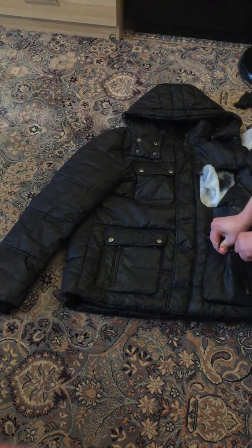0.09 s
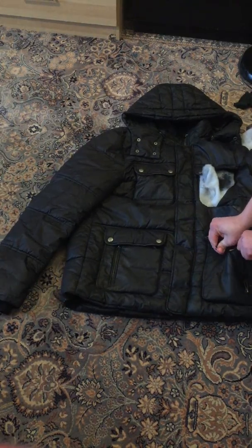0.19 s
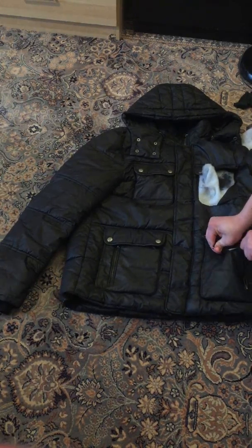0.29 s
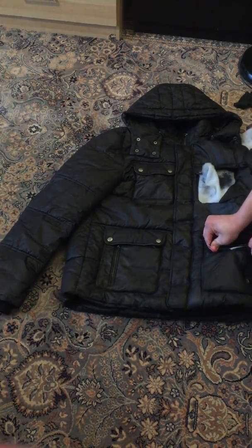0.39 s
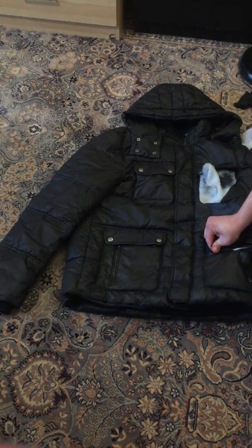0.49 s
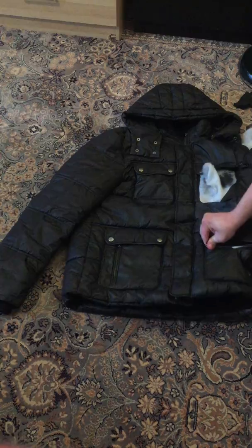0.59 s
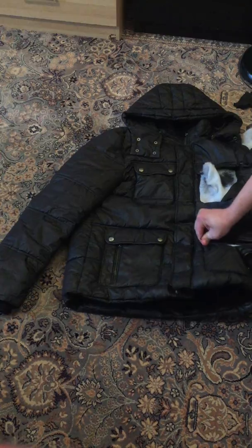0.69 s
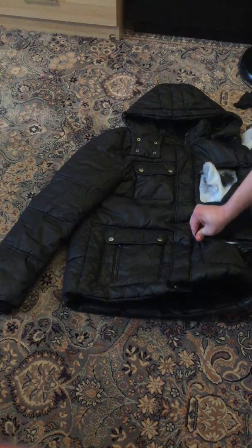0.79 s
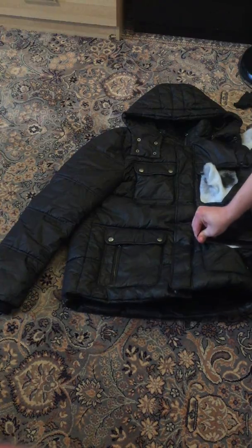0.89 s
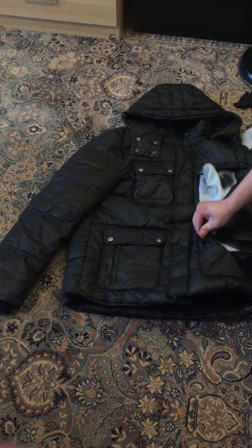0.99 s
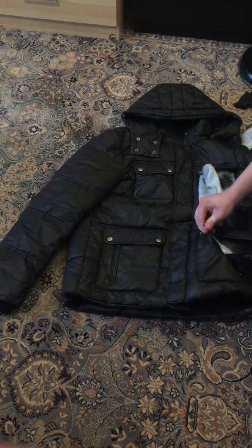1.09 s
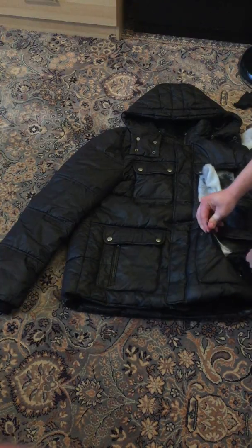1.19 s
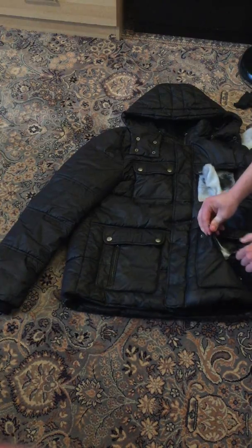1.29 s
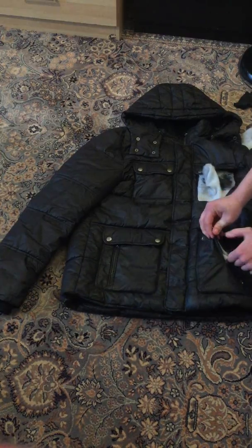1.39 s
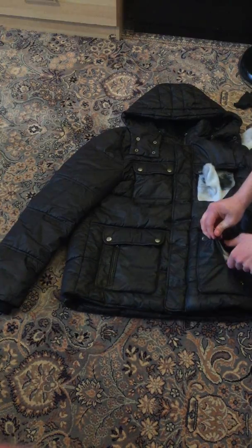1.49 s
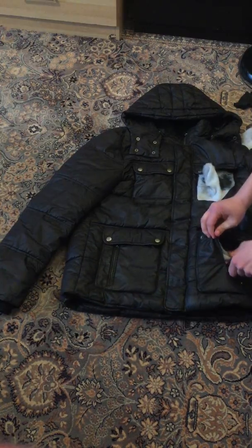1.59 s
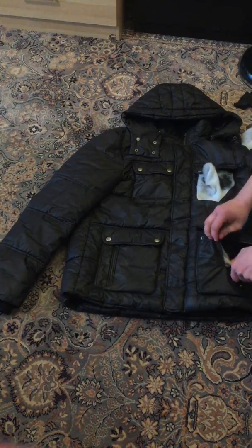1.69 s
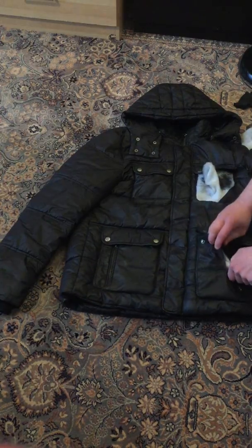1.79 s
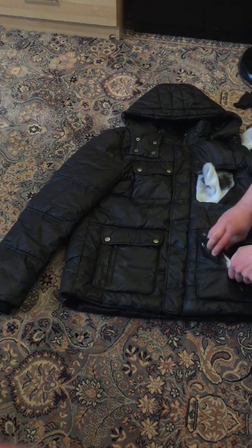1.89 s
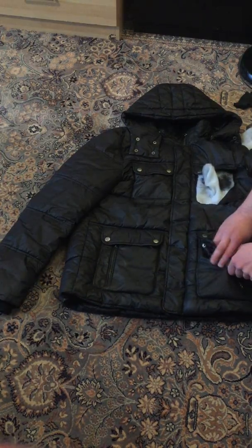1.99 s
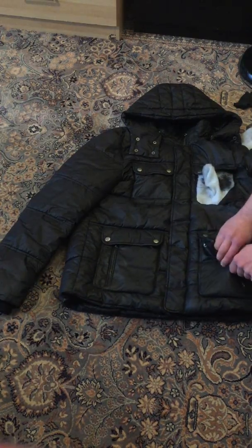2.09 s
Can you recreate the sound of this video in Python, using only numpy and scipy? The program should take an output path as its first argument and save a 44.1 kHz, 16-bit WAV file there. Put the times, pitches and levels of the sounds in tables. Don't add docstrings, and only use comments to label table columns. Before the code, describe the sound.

Jacket fabric tearing loudly by hand: a few single thread snaps, then two ragged, crackling rips within the first second, followed by barely audible rustling of the shell in a small carpeted room, close phone microphone.

```python
import sys
import numpy as np
from scipy import signal
from scipy.fft import rfft, irfft
from scipy.io import wavfile
from scipy.ndimage import uniform_filter1d

SR = 44100
rng = np.random.default_rng(int(sys.argv[2]) if len(sys.argv) > 2 else 0)


def materialize(psi):
    bounded = np.clip(np.atleast_2d(psi).T, -1, 1)
    quanta = np.round(bounded * 32767).astype(np.int16)
    wavfile.write(sys.argv[1], SR, quanta)


def field_ratio(decibels):
    return 10 ** (np.asarray(decibels, dtype=float) / 20)


N = 92610
T = np.arange(N) / SR

# centre_hz, level_db
FLAP_BODY = [(140, -27.5), (230, -8), (290, -8.5), (355, -2.5), (430, -12.5), (560, -12.5), (760, -36.5)]
# frequency_hz, level_db
THREAD_COLOUR = [(300, -43), (2000, -9), (3400, -2), (5300, -1), (7000, -3), (9500, 1), (12500, -1),
                 (16500, -4.5)]


def unit(x):
    return x / np.sqrt(np.mean(x ** 2))


def band(x, hz, width_hz):
    centre_hz = min(hz, 0.45 * SR)
    b, a = signal.iirpeak(centre_hz, hz / max(width_hz, 1.0), SR)
    return signal.lfilter(b, a, x)


def colour(x, points, size=2048):
    hz, db = np.array(points, float).T
    bins_hz = np.arange(size // 2 + 1) * SR / size
    log_gain = np.interp(np.log(bins_hz + 1), np.log(hz), db) * np.log(10) / 20
    cepstrum = irfft(log_gain)
    cepstrum[1:size // 2] *= 2
    cepstrum[size // 2 + 1:] = 0
    response = irfft(np.exp(rfft(cepstrum)))
    return signal.fftconvolve(x, response)[:len(x)]


def walk(rate_hz):
    hold = int(SR / rate_hz)
    levels = rng.standard_normal(N)[np.arange(N) // hold]
    return uniform_filter1d(levels, hold // 2 + 1)


def crackle(per_s, spread_db):
    clicks = rng.random(N) < per_s / SR
    size_db = spread_db * np.clip(rng.standard_normal(N), -3, 1.8)
    direction = np.sign(rng.standard_normal(N))
    return unit(clicks * field_ratio(size_db) * direction)


def air():
    # frequency_hz, level_db_per_hz
    hush_colour = [(88, -22), (150, -1.5), (1000, -8), (2010, -8.5), (4890, -15), (9390, -16.5),
                   (10600, -19), (12400, -18.5), (17000, -22.5)]
    # centre_hz, width_hz, level_db
    house_hum = [(54.2, 15, -76.5), (89.7, 33, -78), (115, 25, -75)]
    hush = unit(colour(rng.standard_normal(N), hush_colour, size=8192))
    hush_db = -68.5 + 0.87 * walk(28)
    hum = np.zeros(N)
    for hz, width_hz, db in house_hum:
        hum += field_ratio(db) * unit(band(rng.standard_normal(N), hz, width_hz))
    return hush * field_ratio(hush_db) + hum


def rips():
    # start_s, length_s, level_db, brightness_db_per_octave, edge_ring_hz
    runs = [(.0, 0.027, -42, -1, 6500), (0.032, 0.15, -56.5, 1, 14300), (0.2263, 0.0047, -28, 2.5, 5190),
            (0.247, 0.018, -53, -0.5, 8800), (0.2643, 0.0031, -26, -1.5, 8400),
            (0.272, 0.011, -35.5, 0.5, 9500), (0.288, 0.006, -30.5, 0.5, 8700), (0.3, 0.042, -36, -1, 8800),
            (0.346, 0.0053, -28.5, 0.5, 9250), (0.357, 0.011, -30.5, -0.5, 9350),
            (0.387, 0.006, -31, -1, 9200), (0.399, 0.0042, -32, 0.5, 8800), (0.406, 0.0097, -29.5, 0, 6250),
            (0.421, 0.003, -32, -2.5, 6000), (0.4332, 0.0029, -21.5, -0.2, 8500),
            (0.438, 0.012, -34.5, 0.5, 7900), (0.454, 0.028, -27, 1.9, 7100),
            (0.478, 0.0077, -25.5, -1, 7550), (0.488, 0.032, -25.5, -0.5, 11400),
            (0.498, 0.021, -39.5, 0, 3900), (0.522, 0.034, -26.5, -1, 5100), (0.558, 0.0083, -31, -1, 5000),
            (0.572, 0.013, -29, -0.8, 7340), (0.592, 0.013, -45.5, -0.5, 5000),
            (0.612, 0.0034, -39.5, 3.5, 7500), (0.617, 0.0041, -31, -1.5, 5000),
            (0.621, 0.0048, -36.5, -2.5, 7760), (0.627, 0.026, -53, 2, 8000),
            (0.65, 0.031, -28.5, -0.6, 7260), (0.683, 0.046, -29.5, -0.17, 4090),
            (0.732, 0.021, -32, -0.6, 12800), (0.756, 0.011, -48, -4.5, 8000),
            (0.7702, 0.0063, -25.5, 0.5, 11560), (0.781, .016, -31, -2, 12000),
            (0.8009, 0.054, -28.5, -1, 11940), (0.852, 0.048, -32.5, -1, 9700),
            (0.906, .014, -29.5, -2, 4400), (0.921, 0.022, -35.5, -1.5, 3920)]
    attack_s, release_s = 0.00057, 0.0013
    straggler_db, straggler_s = -15, 0.017
    edge_ring_db, edge_ring_q = 1, 5.9
    threads_per_s, thread_spread_db = 2600, 5.5
    clumps = field_ratio(1.5 * walk(260))
    shared = crackle(threads_per_s, thread_spread_db)
    parts = []
    for edges_hz in ((100, 4500), (4500, 9000), (9000, 20000)):
        grains = shared + 0.94 * crackle(threads_per_s, thread_spread_db)
        sos = signal.butter(2, edges_hz, "band", fs=SR, output="sos")
        parts.append(signal.sosfilt(sos, grains))
    low, middle, high = parts
    out = np.zeros(N)
    for start_s, length_s, db, tilt_db, ring_hz in runs:
        since = T - start_s
        after = np.clip(since - length_s, 0, None)
        decay = np.exp(-after / release_s) + field_ratio(straggler_db) * np.exp(-after / straggler_s)
        shape = np.clip(since / attack_s, 0, 1) * decay
        tilted = low * field_ratio(-3 * tilt_db) + middle + high * field_ratio(1.15 * tilt_db)
        run = shape * clumps * tilted
        edge_ring = band(run, ring_hz, ring_hz / edge_ring_q)
        out += field_ratio(db - 4.5) * (run + field_ratio(edge_ring_db) * edge_ring)
    return out


def snaps(rows, lift_db=0, extra_ring_db=0):
    click_db, ring_db = 2.5, -5
    fray_db, fray_t60_s = -16, 0.006
    creak_db, creak_s = -26, 0.0009
    size, lead = SR // 50, int(creak_s * SR)
    fray = np.exp(-np.log(1000) * np.arange(size) / SR / fray_t60_s) * field_ratio(fray_db)
    fade = np.roll(fray, lead)
    fade[:lead] = field_ratio(creak_db)
    out = np.zeros(N + SR)
    for (start_s, db, hz), fibre in zip(rows, rng.standard_normal((len(rows), size))):
        push = fibre * fade
        push[lead] = 1
        ring = 2 * band(push, hz, hz / 3)
        k = int(start_s * SR)
        out[k:k + size] += field_ratio(db + click_db + lift_db) * (push + field_ratio(ring_db + extra_ring_db) * ring)
    return out[:N]


def jerks():
    # time_s, level_db
    tugs = [
        (.170, -39),
        (.227, -33),
        (0.265, -30),
        (.435, -35),
        (0.734, -19.5),
        (0.786, -18),
    ]
    kicks = np.zeros(N)
    for time_s, db in tugs:
        kicks[int(time_s * SR)] = field_ratio(db + 22.5)
    return colour(kicks, FLAP_BODY)


def jacket():
    # time_s, peak_db, ring_hz
    first_snaps = [(0.0034, -25.5, 6130), (0.0128, -56, 5460), (0.0236, -28, 12500), (0.0274, -24.5, 10200),
                   (0.0502, -24, 10400), (0.0568, -23.5, 6890), (0.113, -33, 12970), (0.1207, -23.5, 11740),
                   (0.1437, -24.5, 9680), (0.169, -15, 5360), (0.2003, -14, 10150), (0.2182, -23.5, 5100),
                   (0.2235, -22.5, 9000), (0.2262, -12, 5060), (0.2296, -23, 12150), (0.2556, -22, 9500)]
    # time_s, peak_db, ring_hz
    rip_snaps = [(0.2662, -18.5, 8400), (0.2703, -24.5, 8400), (0.2793, -20.0, 9800),
                 (0.2828, -29, 9050), (0.291, -19, 8640), (0.3036, -17.5, 9000),
                 (0.3088, -19.0, 8350), (0.312, -16, 7850), (0.3191, -24.5, 8930),
                 (0.3224, -16, 8250), (0.3307, -16, 8970), (0.3339, -33.5, 8700),
                 (0.3373, -20.5, 9400), (0.3469, -19.5, 9700), (0.3505, -14.5, 8970),
                 (0.3611, -20, 9100), (0.3651, -21.0, 9600), (0.3684, -14, 9450), (0.3892, -29, 9400),
                 (0.403, -30.5, 9360), (0.4105, -27, 5300), (0.4202, -19, 5250),
                 (0.4339, -20.5, 8700), (0.447, -25.5, 8960), (0.4553, -24, 6110),
                 (0.4618, -20, 6400), (0.4669, -19.5, 6600), (0.4698, -19, 9160),
                 (0.4757, -23.5, 7100), (0.4797, -18.5, 7110), (0.4852, -19.5, 4100),
                 (0.4901, -17.0, 11400), (0.4943, -19.5, 11400), (0.4979, -13, 11300),
                 (0.5021, -25, 11400), (0.5074, -15.5, 11580), (0.5161, -12.5, 4900),
                 (0.5362, -29, 5000), (0.5485, -19.5, 4260), (0.5568, -22, 3540),
                 (0.6184, -20, 4700), (0.6374, -19, 5670), (0.653, -18, 7740), (0.6628, -24, 8400),
                        (0.6714, -18, 8500), (0.6745, -26, 12100), (0.6885, -22, 13100),
                        (0.6946, -18.0, 11600), (0.6993, -21.5, 4800), (0.7145, -22.5, 13600),
                        (0.7327, -15.5, 14100), (0.7356, -33, 12100), (0.7466, -24, 11700),
                        (0.7506, -30, 12600), (0.7667, -26, 7750), (0.7723, -20.5, 9700),
                        (0.7831, -18, 5600), (0.7864, -20, 3000), (0.7936, -20, 11300),
                        (0.8003, -18.0, 13000), (0.8077, -15.5, 14700), (0.8121, -17, 14400),
                        (0.8173, -20, 11530), (0.8206, -17.5, 12300), (0.8273, -15, 11200),
                        (0.8328, -22, 14600), (0.8373, -23.5, 11400), (0.8404, -14.0, 9400),
                        (0.8439, -22, 11000), (0.8561, -20.5, 8800), (0.8632, -16.5, 8800),
                        (0.8731, -22, 7800), (0.8794, -14.5, 9500), (0.8853, -16.5, 8000),
                        (0.8883, -24, 4540), (0.8921, -14.5, 9200), (0.8979, -13, 6900),
                        (0.9074, -8.5, 6800), (0.9142, -19, 5240), (0.9323, -24.5, 8900)]
    # time_s, flap_db, long_seam_db, short_seam_db
    taut = [(0, -9, -5, -2), (.15, -4, -5, -6.5), (.17, 2.5, -6, -10), (.2, -22, -25.5, -2),
            (.23, -3, -17, 7), (.28, -8, -10, -2), (.4, -5.5, 4, 8), (.5, -7.5, -2, -3), (.62, -5, 1.5, -5),
            (.7, 0.5, 0.5, 2), (0.799, 5, 4, -2), (.93, -1, -6, -1.5)]
    # centre_hz, level_db
    long_seam = [(380, -29.5), (600, -5.5), (740, -15), (900, -4.5), (1050, -10), (1320, 0), (1550, -3.5),
                 (2200, -27)]
    # centre_hz, level_db
    short_seam = [(950, -25.5), (1400, -8), (1650, 1), (1900, -2), (2250, -2.5), (2800, -15), (4000, -39.5)]
    inner_snaps = snaps(rip_snaps, lift_db=2.5, extra_ring_db=4)
    breaks = rips() + snaps(first_snaps) + inner_snaps
    out = colour(breaks, THREAD_COLOUR)
    time_s, *shares_db = np.array(taut).T
    for body, share_db, lift_db in zip((FLAP_BODY, long_seam, short_seam), shares_db, (3, -0.5, -1.5)):
        direction = np.sign(rng.standard_normal(N))
        pushes = breaks * direction * field_ratio(np.interp(T, time_s, share_db) + lift_db)
        out = out + colour(pushes, body)
    return out + jerks()


def rustle():
    # time_s, level_db
    hands = [(1.05, -70), (1.16, -68), (1.25, -70), (1.42, -99), (1.49, -66), (1.57, -80), (1.6, -68.5),
             (1.76, -67), (1.82, -76), (1.94, -73), (1.979, -78), (2.1, -92)]
    # frequency_hz, level_db
    shell_colour = [(500, -28), (1500, 5), (2400, 1), (5000, -2.5), (9000, -3), (16000, -6.5)]
    # time_s, length_s, level_db, centre_hz
    brushes = [
        (1.02, .03, -70, 13000),
        (1.13, 0.022, -72, 12000),
        (1.15, 0.062, -73, 530),
        (1.5, 0.035, -75, 4700),
        (1.598, .01, -74, 13000),
        (1.73, 0.06, -77, 13000),
        (1.87, 0.1, -77, 2300),
        (1.25, 0.1, -76, 106),
    ]
    # time_s, peak_db
    crinkles = [
        (1.2644, -57),
        (1.478, -52.5),
        (1.585, -54),
    ]
    time_s, db = np.array(hands).T
    grains = crackle(6000, 5.5)
    rub_db = np.interp(T, time_s, db, left=-90) + 2.0 * walk(25.5)
    out = unit(colour(grains, shell_colour)) * field_ratio(rub_db)
    for centre_s, length_s, level_db, hz in brushes:
        stroke = np.exp(-((T - centre_s) / length_s) ** 2)
        tone = band(band(grains, hz, hz / 1.4), hz, hz / 1.9)
        out += field_ratio(level_db) * stroke * unit(tone)
    folds = snaps([(fold_s, peak_db, 9000) for fold_s, peak_db in crinkles])
    return out + colour(folds, THREAD_COLOUR)


def room(x):
    # centre_hz, t60_s, level_db
    decays = [(279, 0.032, -6), (995, 0.28, 4.5), (2340, 0.22, 5.5), (5000, 0.128, -2.5), (10200, 0.2, -5),
              (15270, 0.19, 0)]
    room_db, gap_s = -8, 0.0016
    carpet_db, carpet_s = -25.5, 0.0006
    t = T[:SR // 2]
    tail = np.zeros(len(t))
    for hz, t60_s, db in decays:
        noise = unit(band(rng.standard_normal(len(t)), hz, 1.46 * hz))
        tail += field_ratio(db) * noise * np.exp(-np.log(1000) * t / t60_s)
    tail = tail * np.clip(t / gap_s - 0.5, 0, 1)
    tail = tail / np.sqrt(np.sum(tail ** 2))
    bounce = np.roll(x, int(carpet_s * SR)) * field_ratio(carpet_db)
    return x + bounce + field_ratio(room_db) * signal.fftconvolve(x, tail)[:N]


def scene():
    return (room(jacket() + rustle()) + air())[None]


def low_pass(x):
    return signal.sosfilt(signal.butter(12, 17220, fs=SR, output="sos"), x)


def record(dry):
    headroom = 0.5
    peak_hz, peak_width_hz, peak_db = 5220, 150, -8
    notch_hz, notch_width_hz, notch_share = 10380, 470, 0.62
    top_hz, low_cut_hz = 17300, 36
    dry = headroom * np.tanh(dry / headroom)
    x = dry + field_ratio(peak_db) * band(dry, peak_hz, peak_width_hz)
    x = x - notch_share * band(x, notch_hz, notch_width_hz)
    x = signal.sosfilt(signal.cheby2(12, 32, top_hz, fs=SR, output="sos"), x)
    x = signal.sosfilt(signal.butter(3, low_cut_hz, "high", fs=SR, output="sos"), x)
    return low_pass(x)


dry = scene()
out = record(dry)
materialize(out)
```